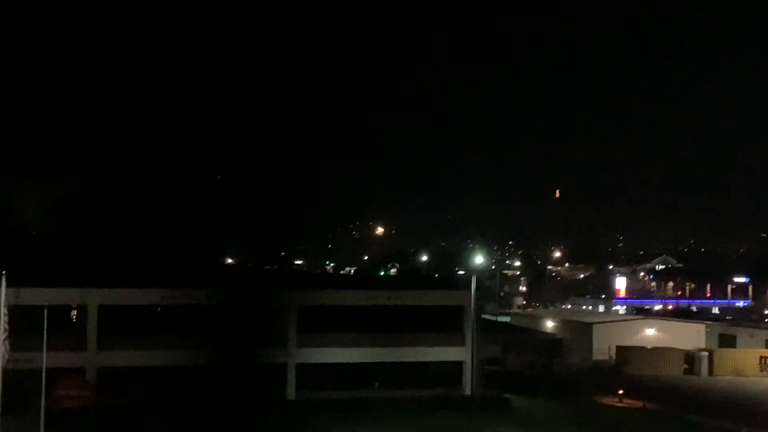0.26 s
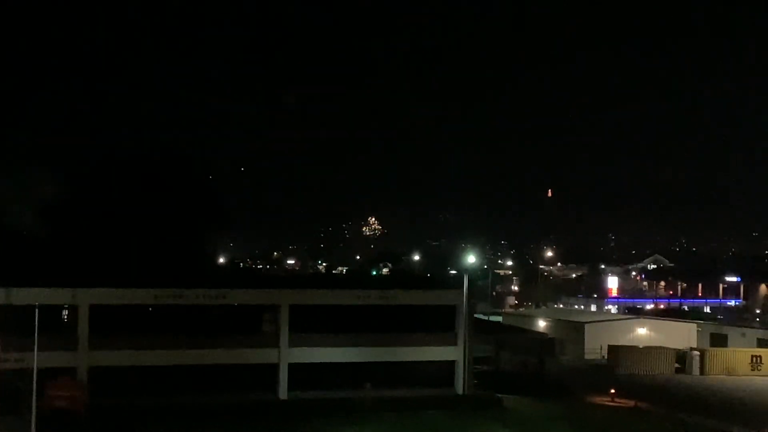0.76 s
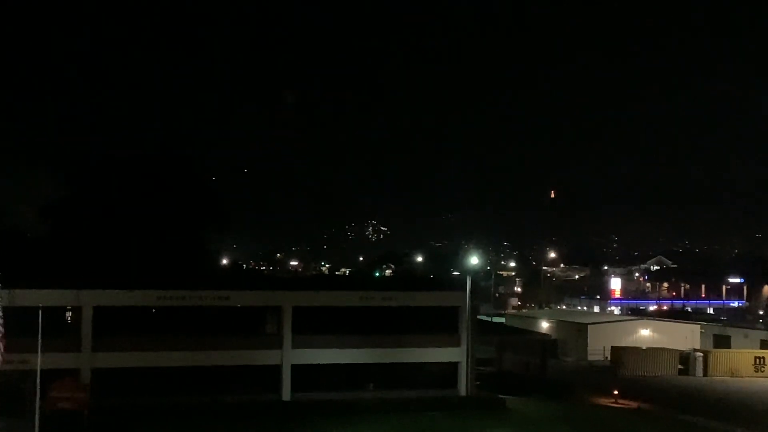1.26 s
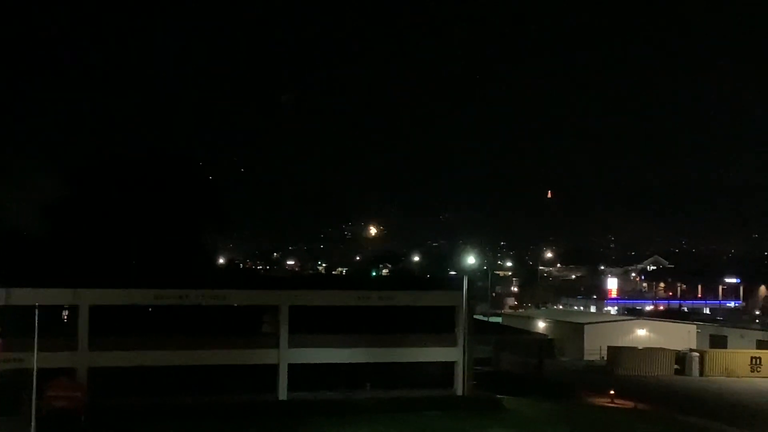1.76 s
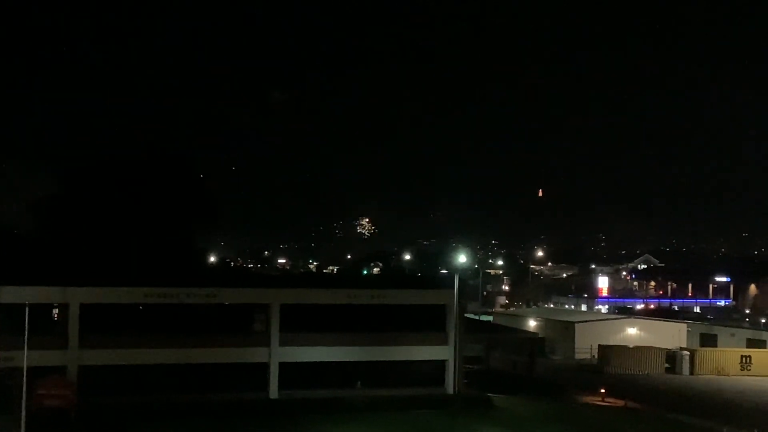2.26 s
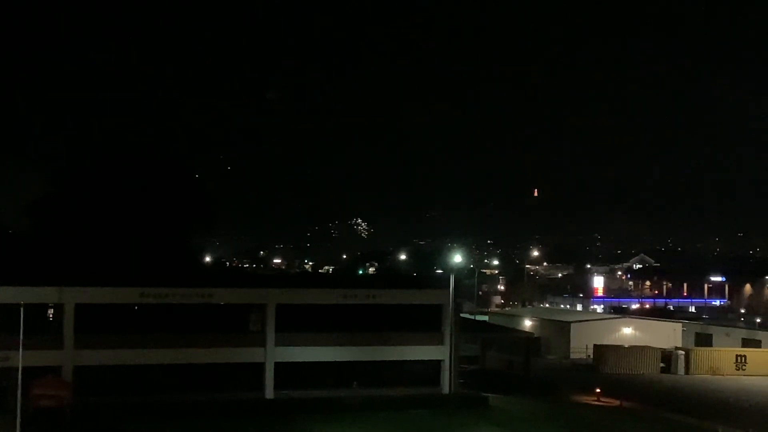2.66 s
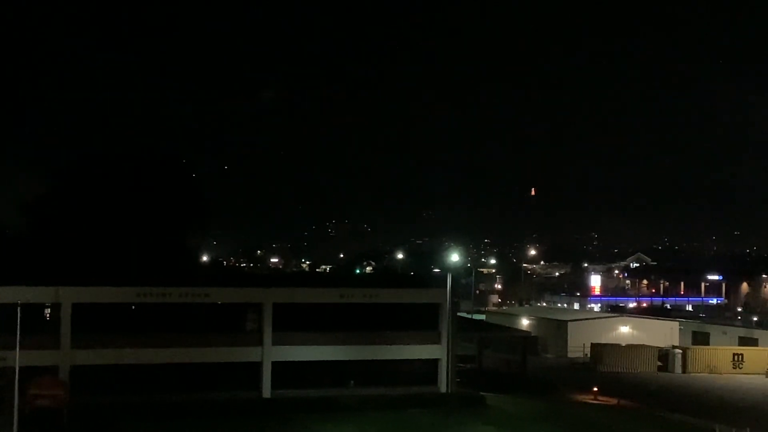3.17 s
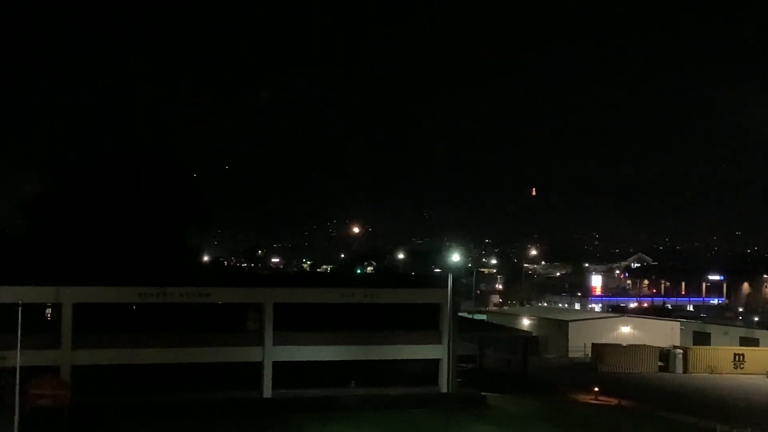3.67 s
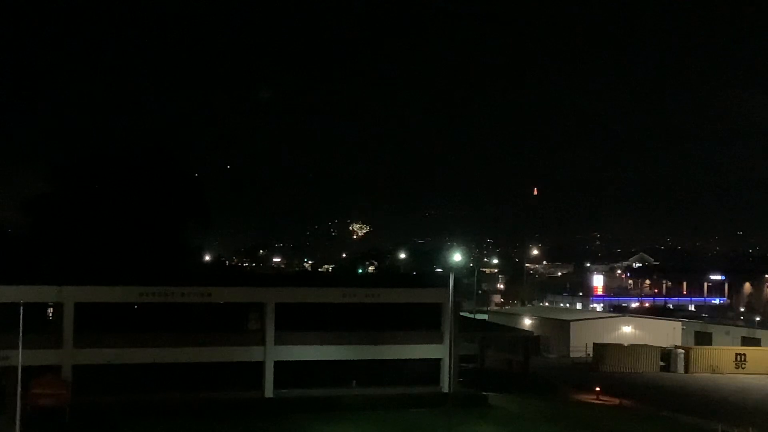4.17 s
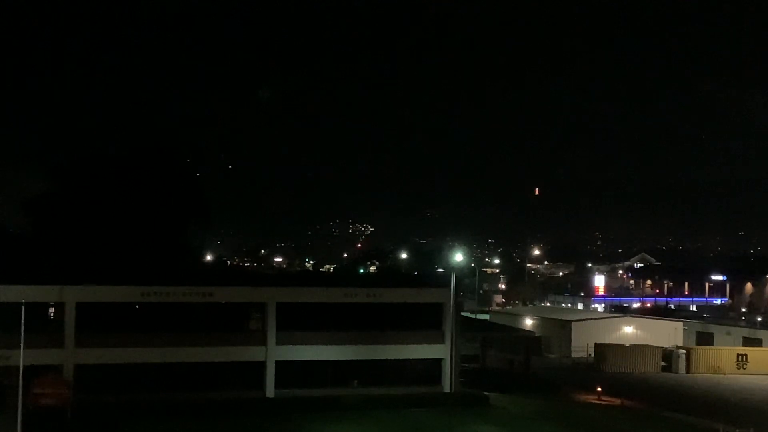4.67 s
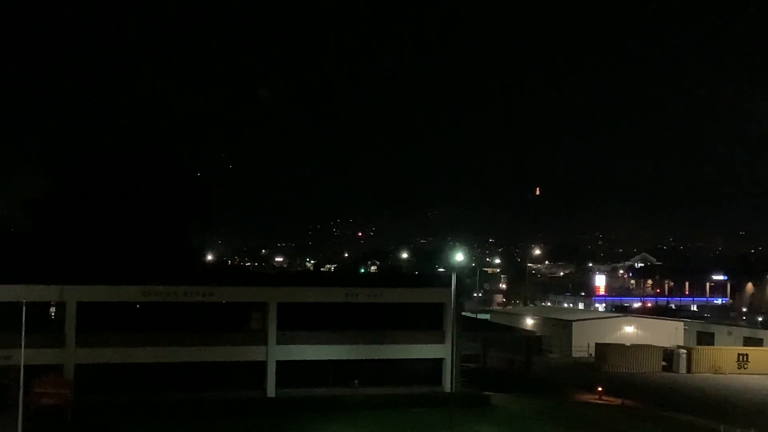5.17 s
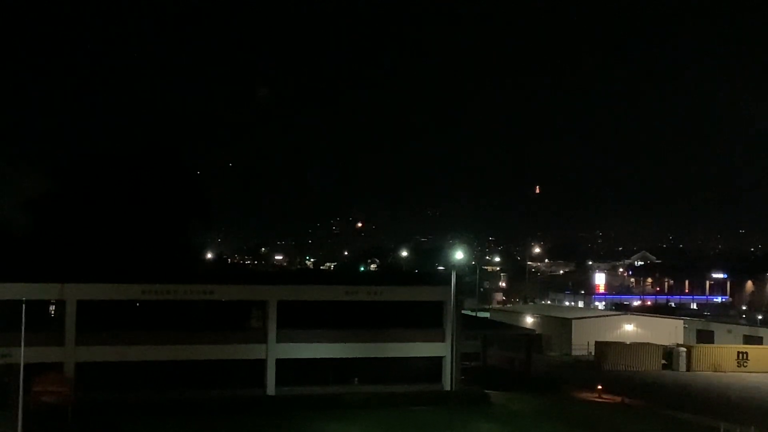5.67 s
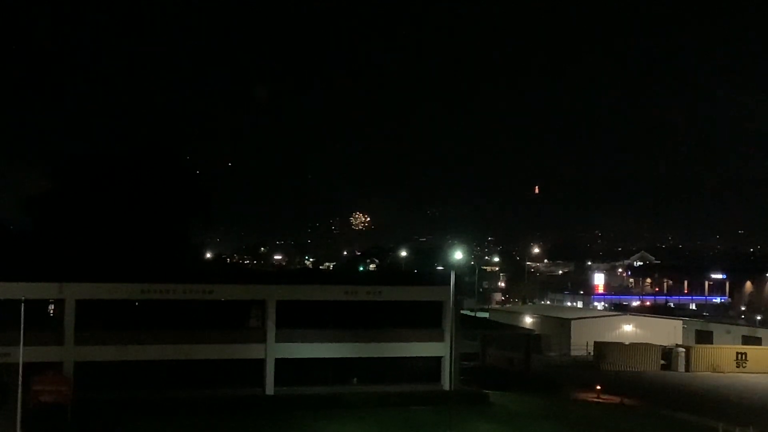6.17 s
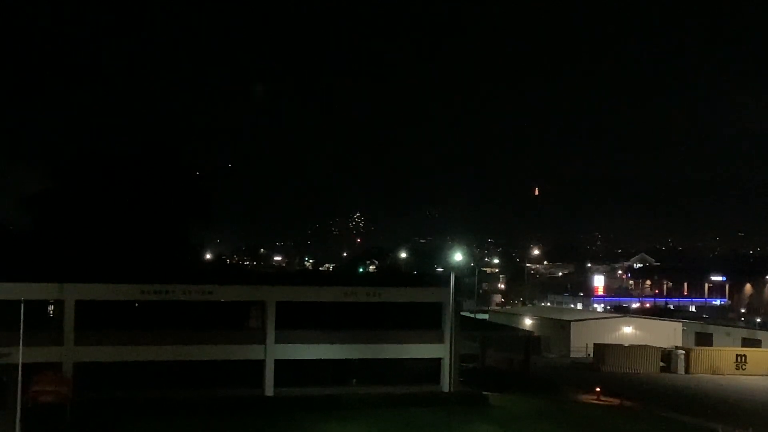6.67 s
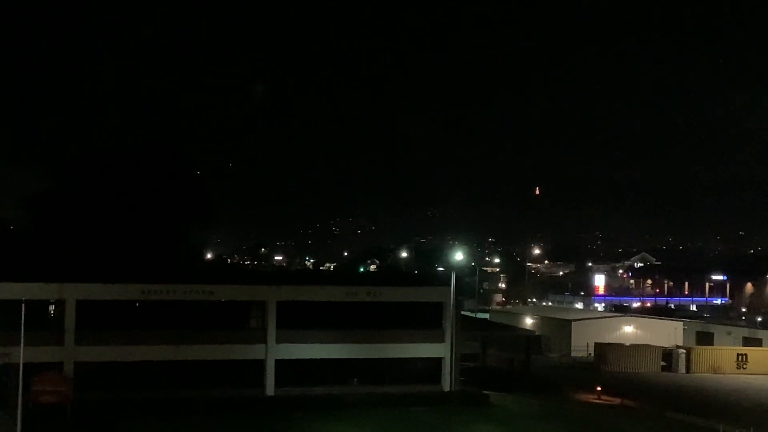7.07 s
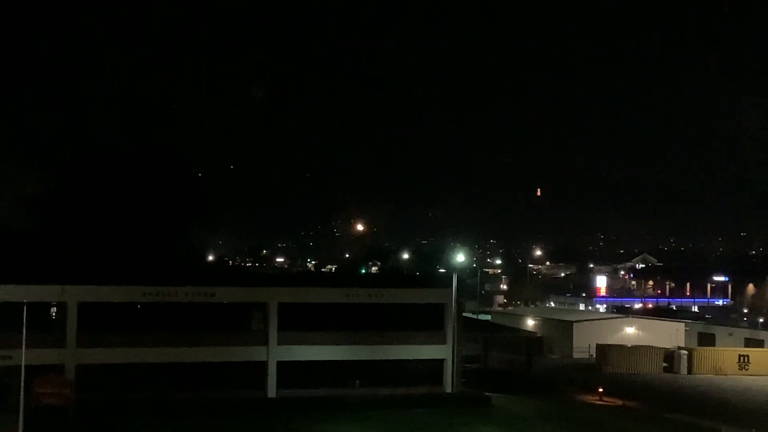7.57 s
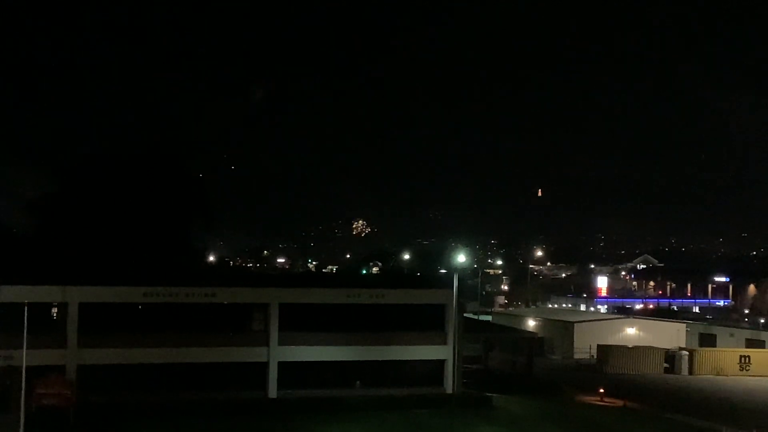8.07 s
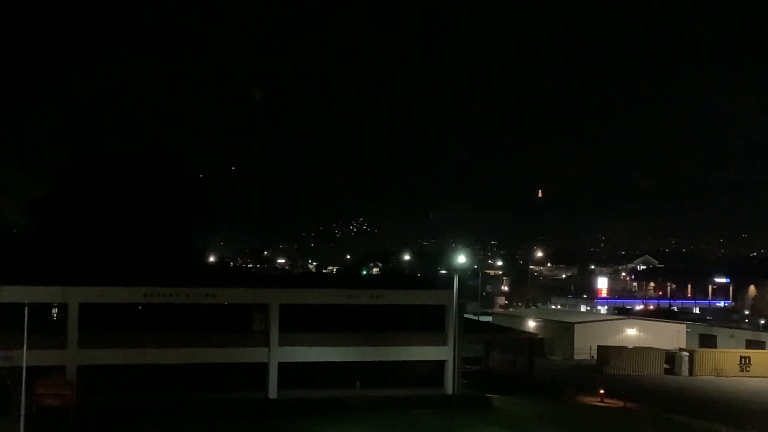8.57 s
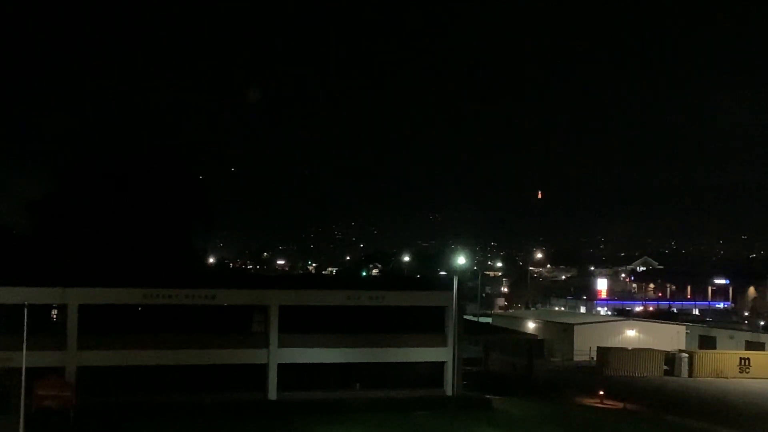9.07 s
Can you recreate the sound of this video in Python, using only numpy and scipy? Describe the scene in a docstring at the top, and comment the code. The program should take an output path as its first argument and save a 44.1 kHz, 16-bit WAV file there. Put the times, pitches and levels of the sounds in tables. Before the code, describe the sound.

A distant firework display heard outdoors at night from a hillside, treble dulled by air, with a steady low town hum and faint microphone hiss. At 0 s, fading crackle and the soft roll of earlier shells. Around 0.4-1 s, tiny close rustles of hiss, a cluster of short hollow pops and low thumps, and a grainy swell of crackle. From 2.0 to 2.7 s a dense salvo of about eleven heavy shells: muffled cracks with deep booms just behind, smeared by echoes. Snaps and thumps trail to 3.2 s while hills roll back the rumble; two very faint whistles arch near 3.3 and 3.5 s. Pops near 4.1 s; a distant wash of cracks returns around 4.6-5.2 s. Sparse thumps follow, then crackle and rapid snaps peak at 6.5-7.1 s. It thins out until one heavy bang at 8.45 s, with rolling echoes and a few last pops to about 9.1 s.

```python
"""Fireworks over a town, heard at night from a hillside far away.
From the start the town hums, grainy bursts of crackling stars swell and fade, and older shells still roll.
Close rustles of hiss come next, then short pops, ragged snaps with hollow bodies, and low resonant thumps.
At two seconds a salvo of heavy shells cracks with a boom just behind; slopes and hills roll it back.
Two faint gliding whistles pass, a far ridge returns a wash of cracks, and late on a single heavy shell goes off."""
import sys
import numpy as np
from scipy import signal
from scipy.fft import rfft, irfft
from scipy.io import wavfile
from scipy.ndimage import uniform_filter1d, minimum_filter1d

SR = 44100
rng = np.random.default_rng(int(sys.argv[2]) if len(sys.argv) > 2 else 0)


def log_audio(samples):
    """Write samples as a 16-bit WAV file to the path given in sys.argv[1]."""
    # one column per channel
    frames = np.atleast_2d(samples).T
    # limit to full scale, then quantise
    limited = np.clip(frames, -1, 1)
    pcm = np.round(limited * 32767).astype(np.int16)
    wavfile.write(sys.argv[1], SR, pcm)


N = 410571  # length in samples

# Layer levels in the tables are set before echoes, wavering and the trim of the whole mix.


def undb(db):
    """Decibels to gain."""
    return 10 ** (np.asarray(db) / 20)


def unit(x):
    """Scale to rms 1."""
    return x / np.sqrt(np.mean(x ** 2))


def unit_peak(x):
    """Scale so that the loudest 5 ms have rms 1."""
    return x / np.sqrt(uniform_filter1d(x ** 2, size=220).max())


def add(out, start_s, x):
    """Mix x into out from start_s on, cutting what runs past the end."""
    start = max(int(start_s * SR), 0)
    out[start:start + len(x)] += x[:max(len(out) - start, 0)]


def pulse(spectrum, lag_cycles=0, size=8192):
    """Causal pulse with this spectrum; a long grazing path delays each frequency by some of its own cycles."""
    hz, db = np.transpose(spectrum)
    log_f = np.log(np.maximum(np.fft.rfftfreq(size, 1 / SR), 10))
    level_db = np.interp(log_f, np.log(hz), db)
    # folding the cepstrum forward gives minimum phase: the energy comes as early as it can
    cepstrum = irfft(np.log(undb(level_db)))
    cepstrum[1:size // 2] *= 2
    cepstrum[size // 2 + 1:] = 0
    lag_phase = 2j * np.pi * lag_cycles * log_f
    return irfft(np.exp(rfft(cepstrum) - lag_phase))[:size // 2]


def colour(x, spectrum):
    """Filter by a spectrum, rms 1."""
    return unit(signal.fftconvolve(x, pulse(spectrum))[:N])


def tune(x, hz, q):
    """Broad resonance that gives a sound its own pitch."""
    return signal.lfilter(*signal.iirpeak(hz, q, fs=SR), x)


def air(x, edge_hz):
    """A long way through air takes the treble."""
    return signal.sosfilt(signal.butter(3, min(edge_hz, .4 * SR), fs=SR, output="sos"), x)


def grains(per_s, spread_db, count=N):
    """Random clicks, many small and a few large, rms 1."""
    chance, size = rng.random(count), rng.exponential(size=count)
    sign = rng.choice([-1, 1], count)
    # sizes spread exponentially in dB, capped so that no grain stands out alone
    level = undb(spread_db * np.minimum(size, 4))
    return unit((chance < per_s / SR) * sign * level)


def scatter(x, db, t60, wait_s):
    """The sound followed by a dying spray of echoes from roofs and trees."""
    t = np.arange(SR // 3) / SR
    decay = np.exp(-np.log(1000) * t / t60)
    onset = np.clip(t / wait_s - 1, 0, 1)
    echoes = grains(2500, 3, count=len(t)) * decay * onset
    echoes *= undb(db) / np.linalg.norm(echoes)
    echoes[0] = 1  # the direct sound
    return signal.fftconvolve(x, echoes)


def walk(rate):
    """Random levels held 1 / rate s and slewed twice, rms 1."""
    hold = int(SR / rate)
    steps = np.repeat(rng.standard_normal(N // hold + 1), hold)
    return unit(uniform_filter1d(uniform_filter1d(steps, hold), hold)[:N])


def even(x, size=1764):
    """Smooth out chance swells, as a great many overlapping echoes do; rms 1."""
    power = uniform_filter1d(uniform_filter1d(x ** 2, size=size), size=size)
    return unit(x / np.sqrt(power + np.mean(power) / 20))


# spectrum of the town's hum: freq_hz, level_db
TOWN_SPECTRUM = [(20, -49), (33, -30), (48, -5), (82, 3), (125, -3.5), (200, -5.5), (350, -9), (700, -17.5),
                 (1500, -26), (3000, -61)]


def town():
    """Low hum of streets: shaped noise, gently wavering."""
    return colour(rng.standard_normal(N), TOWN_SPECTRUM) * undb(-37.5 + 0.27 * walk(1.2))


# bursts of crackling stars: turn_s (end of the swell), roar_db, fizz_db,
# fade_db_per_s (of the roar; below zero it goes on rising)
STAR_BURSTS = [(0.0, -46.5, -60, 12.5), (0.63, -39, -56, 10), (2.62, -40, -54.5, 10.5),
               (3.5, -42, -60, 9.5), (4.021, -44, -56.5, 16), (4.95, -67, -65.5, 8),
               (6.568, -39, -51.5, 11), (6.98, -53, -75, 40), (8.6, -65, -66, 4), (9.3, -54, -64, -1)]
# spectrum of the stars' roar: freq_hz, level_db
ROAR_SPECTRUM = [(100, -19.5), (280, 2.5), (480, 2), (720, -0.5), (1000, -11), (1600, -14), (2200, -25.5),
                 (3000, -31.5), (4200, -43.5), (8000, -89.5)]
# spectrum of the stars' fizz: freq_hz, level_db
FIZZ_SPECTRUM = [(900, -16), (2000, 11), (2900, 8.5), (4000, -2.5), (5800, -7.5), (6600, -23.5),
                 (9000, -27), (15000, -43.5)]
# spectrum of a snap, in the stray stars and the pops, before tuning: freq_hz, level_db
SNAP_SPECTRUM = [(150, -6), (400, 1), (750, 3), (1200, 2), (1750, -1), (2200, -9), (3000, -13), (4000, -30),
                 (6000, -32), (9000, -55)]
SWELL_DB_PER_S, FIZZ_HASTE = 28, 1.31  # build of the roar; the fizz comes and goes this many times faster
FAR_ROAR_DB, FAR_FIZZ_DB = -51.5, -68  # the rest of the display, always there
STRAYS_PER_S, STRAY_DB = 12, -12  # single stars that stand out of the roar
BUNCHES_PER_S, BUNCH_ROAR_DB, BUNCH_FIZZ_DB = 90, 0.7, 1.4  # how often and how far bunched stars jump


def crackle():
    """Stars going off in bunches make a grainy roar with fizz on top, and a few snap out singly."""
    t = np.arange(N) / SR
    roar_level, fizz_level = undb(FAR_ROAR_DB), undb(FAR_FIZZ_DB)
    for turn_s, roar_db, fizz_db, fade_db_per_s in STAR_BURSTS:
        below_db = np.maximum(SWELL_DB_PER_S * (turn_s - t), fade_db_per_s * (t - turn_s))
        roar_level = np.hypot(roar_level, undb(roar_db - below_db))
        fizz_level = np.hypot(fizz_level, undb(fizz_db - FIZZ_HASTE * below_db))
    # roar and fizz share the same stars and bunches
    stars, bunches = grains(1400, 2.8), walk(BUNCHES_PER_S)
    roar = colour(stars + 1.03 * rng.standard_normal(N), ROAR_SPECTRUM)
    roar = roar * undb(6.5 + BUNCH_ROAR_DB * bunches)
    fizz = colour(stars + 0.73 * rng.standard_normal(N), FIZZ_SPECTRUM)
    fizz = fizz * undb(0.47 + BUNCH_FIZZ_DB * bunches)
    strays = scatter(grains(STRAYS_PER_S, 3.1), db=-3.0, t60=0.072, wait_s=0.00027)
    strays = unit(tune(colour(strays, SNAP_SPECTRUM), hz=990, q=0.55))
    return (roar + undb(STRAY_DB) * strays) * roar_level + fizz * fizz_level


# heavy shells: start_s, crack_db, body_db (hollow), boom_db, treble_edge_hz (first path), boom_pitch_hz
HEAVY_SHELLS = [(2.002, -19.5, -23.5, -5, 2820, 190), (2.077, -20, -28.5, -3, 2770, 192.6),
                (2.0828, -20.5, -23, -7, 2800, 190.4), (2.1153, -21.5, -23, -11.5, 2780, 189.3),
                (2.1501, -26, -25.5, -12, 2720, 199), (2.240, -22.5, -35, -5.5, 2900, 193),
                (2.286, -23.5, -33, -6.5, 2900, 180), (2.342, -21, -22.5, -5.5, 3040, 184.3),
                (2.4729, -15, -17, -3.5, 4420, 199.2), (2.4863, -32, -24.5, -8.5, 3040, 182.5),
                (2.666, -25, -27, -12.5, 2970, 185), (8.4454, -17, -15, -6, 2430, 191)]
# hills that return each heavy boom as a low roll: delay_s, spread_s, level_db
HILL_RETURNS = [(0.65, 0.2, -34), (1.701, 0.68, -34), (3.3, 0.25, -34), (4.301, 0.27, -38.5)]
# spectrum of the roll: freq_hz, level_db
ROLL_SPECTRUM = [(40, -45), (90, -13.5), (122, -10.5), (160, -7.5), (200, 0), (225, -11), (255, -9.5),
                 (380, -31), (600, -30.5), (2000, -85)]
OLD_ROLL_DB, OLD_ROLL_DB_PER_S = -36.5, 2.5  # roll of earlier shells at the start, and its decay


def roll():
    """Hills return every heavy boom as a dense, even roll, on top of what is left from earlier shells."""
    t = np.arange(N) / SR
    power = undb(OLD_ROLL_DB - OLD_ROLL_DB_PER_S * t) ** 2
    returns = np.zeros(N)
    for delay_s, spread_s, level_db in HILL_RETURNS:
        returns += undb(level_db) ** 2 * np.exp(-.5 * ((t - delay_s) / spread_s) ** 2)
    for start_s, _, _, boom_db, _, _ in HEAVY_SHELLS:
        add(power, start_s, undb(boom_db) ** 2 * returns)
    rumble = even(colour(grains(1600, 1.2), ROLL_SPECTRUM))
    return rumble * np.sqrt(power) * undb(-0.67 + 0.85 * walk(19))


# faint high rustles close by: start_s, fade_s (to 1/e), level_db
RUSTLE_EVENTS = [(0.35, 0.04, -62), (0.5, 0.26, -68), (9, 0.066, -74)]
# spectrum of a rustle: freq_hz, level_db
RUSTLE_SPECTRUM = [(3000, -26), (4300, -2), (5100, 2), (6100, 1), (6700, -8), (9000, -14), (12000, -33)]


def rustles():
    """Tiny scrapes of hiss that start quickly and die."""
    hiss, level = colour(rng.standard_normal(N), RUSTLE_SPECTRUM), np.zeros(N)
    t = np.arange(SR // 2) / SR
    attack = np.minimum(t / .002, 1)
    for start_s, fade_s, level_db in RUSTLE_EVENTS:
        add(level, start_s, undb(level_db) * attack * np.exp(-(t / fade_s) ** 2))
    return hiss * level


# short pops (small shells, single loud stars and hollow echoes): start_s, crack_db, body_db, snap_pitch_hz
POP_EVENTS = [(0.424, -27.5, -21, 1490), (0.487, -39.5, -39.5, 1100), (0.635, -24.5, -32.5, 1050),
              (0.679, -34.5, -39, 850), (0.697, -26.5, -24, 650), (0.737, -34.5, -35, 700),
              (0.775, -38.5, -42, 1200), (0.8145, -30, -24, 600), (1.042, -36, -44, 1590),
              (1.661, -46, -33.5, 594), (2.411, -36, -26.5, 600), (2.589, -34.5, -26.5, 800),
              (2.697, -25, -31, 997), (2.760, -27.5, -28, 755), (2.835, -36, -32.5, 994),
              (2.992, -35.5, -25, 493), (3.045, -36.5, -29.5, 600), (3.1047, -34.5, -34, 1210),
              (3.675, -37, -30, 600), (3.705, -35, -49, 1000), (4.076, -24.5, -32, 900),
              (4.139, -27, -23.5, 650), (4.484, -34.5, -37, 1300), (4.558, -40, -39, 600),
              (5.429, -43, -28.5, 450), (5.633, -28, -24, 750), (5.898, -42, -47, 920),
              (6.124, -47, -32, 500), (6.211, -35, -36, 900), (6.358, -41, -43, 1100),
              (6.538, -27, -41.5, 1100), (6.5815, -23, -31, 900), (6.603, -30, -32, 650),
              (6.6196, -27.5, -32.5, 1100), (6.647, -28, -28, 550), (6.685, -24.5, -30.5, 695),
              (6.73, -25, -35, 945), (6.794, -27.5, -31, 800), (6.947, -37, -45, 1090),
              (6.988, -35, -32, 1200), (7.028, -33.5, -38, 1100), (7.131, -29.5, -24, 600),
              (7.6, -42, -30, 600), (7.688, -38, -26, 450), (7.786, -45, -27.5, 450),
              (8.157, -47, -34.5, 600), (8.7055, -35, -31, 900), (9.0652, -30, -24.5, 765)]
# spectrum of the hollow body of pops and heavy shells: freq_hz, level_db
BODY_SPECTRUM = [(100, -19.5), (220, -9.5), (300, 0.5), (470, -5), (680, -10.5), (1000, -21), (2000, -33),
                 (5000, -87.5)]


def pops():
    """A compact, ragged snap at its own pitch, with a hollow body smeared by the rooftops."""
    snap = pulse(SNAP_SPECTRUM, lag_cycles=0.495)
    body = unit_peak(pulse(BODY_SPECTRUM, lag_cycles=0.797))
    out = np.zeros(N)
    for start_s, crack_db, body_db, snap_pitch_hz in POP_EVENTS:
        crack = scatter(tune(snap, snap_pitch_hz, q=1.3), db=-1, t60=0.05, wait_s=0.0004)
        add(out, start_s, undb(crack_db) * unit_peak(crack))
        add(out, start_s, undb(body_db) * scatter(body, db=0.5, t60=0.12, wait_s=0.0014))
    return out


# low thumps (lows of shells, crackle and ridge echoes): start_s, level_db, pitch_hz
THUMP_EVENTS = [(0.426, -15, 227), (0.445, -18.5, 124.8), (0.823, -23, 182), (0.887, -20.5, 195),
                (1.196, -26, 178), (2.541, -15.5, 149), (2.603, -17.5, 150), (2.70, -14, 137.3),
                (2.827, -18.5, 160.3), (2.991, -32, 171), (3.036, -20.5, 146), (4.174, -28, 198),
                (5.311, -22, 195), (5.496, -25, 200), (5.63, -32, 205), (5.721, -21, 196),
                (6.116, -28, 196), (6.58, -26, 131), (6.623, -32, 110), (6.684, -27, 170),
                (7.132, -25.5, 188), (7.791, -34, 169), (8.464, -22.5, 150), (8.85, -22.5, 198),
                (8.885, -31, 187), (9.07, -24.5, 172)]
# spectrum of a thump before tuning: freq_hz, level_db
THUMP_SPECTRUM = [(40, -24.5), (90, 1.5), (150, -2), (200, -1), (270, 0), (400, -25), (1000, -41),
                  (3000, -88.5)]


def thumps():
    """Low thumps, each a dull pulse through a resonance at its own pitch, smeared by echoes."""
    dull, out = pulse(THUMP_SPECTRUM, lag_cycles=0.4664), np.zeros(N)
    for start_s, level_db, pitch_hz in THUMP_EVENTS:
        thump = unit_peak(tune(dull, pitch_hz, q=1.8))
        add(out, start_s, undb(level_db) * scatter(thump, db=1.0, t60=0.28, wait_s=0.002))
    return out


def valley(x):
    """Far slopes return the reports as a long roll and lose some of the bass."""
    t = np.arange(3 * SR) / SR
    echoes = grains(300, 3.2, count=len(t)) * undb(-60 * t / 2.0) * (1 - np.exp(-t / 0.02))
    bass = signal.sosfilt(signal.butter(1, 300, fs=SR, output="sos"), x)
    returned = x - 0.37 * bass
    return undb(-11.5) * signal.fftconvolve(returned, echoes / np.linalg.norm(echoes))[:N]


# paths of a heavy report by way of the slope: delay_s, crack_db, boom_db, treble_share (of the edge, 0-1)
SLOPE_PATHS = [(0, 3, -13.5, 1), (.0078, -3.5, 3, 0.65), (0.013, -9.5, -29, .6),
               (0.042, -24.5, -25.5, 0.35)]
# buildings, and a hill for the latest ones, slap each heavy crack back: delay_s, level_db (relative to the
# crack setting)
SLAPS = [(.051, -20.5), (.178, -22.5), (0.219, -22.5), (.364, -21.5), (.402, -22.5)]
# spectrum of a heavy crack: freq_hz, level_db
CRACK_SPECTRUM = [(120, -11), (300, -3.5), (750, 4.5), (1100, -4), (1600, -7.5), (2200, -21.5), (3000, -22),
                  (4000, -37.5), (6000, -50.5), (9000, -74)]
# spectrum of a boom before shifting to the shell's pitch: freq_hz, level_db
BOOM_SPECTRUM = [(30, -68), (55, -24.5), (75, -10), (104, -0.5), (126, -9.5), (155, 3), (190, 6.5),
                 (220, -4.5), (270, -12), (400, -37), (800, -31), (3000, -80)]
# spectrum of a slap: freq_hz, level_db
SLAP_SPECTRUM = [(150, -17.5), (330, 8), (650, -1), (950, -15.5), (1600, -23.5), (3000, -44), (6000, -86.5)]
BOOM_PEAK_HZ = 190  # where the boom spectrum peaks


def heavy_shells():
    """A crack leads over several paths, the boom peaks with the duller second, and buildings and a hill slap
    back."""
    crack = unit_peak(pulse(CRACK_SPECTRUM, lag_cycles=0.591))
    body = unit_peak(pulse(BODY_SPECTRUM, lag_cycles=0.801))
    slap = unit_peak(pulse(SLAP_SPECTRUM, lag_cycles=0.56))
    out = np.zeros(N)
    for start_s, crack_db, body_db, boom_db, treble_edge_hz, boom_pitch_hz in HEAVY_SHELLS:
        # stretching the frequency axis moves the boom to the shell's own pitch
        boom_spectrum = np.array(BOOM_SPECTRUM) * [boom_pitch_hz / BOOM_PEAK_HZ, 1]
        boom = unit_peak(pulse(boom_spectrum, lag_cycles=0.216))
        cracks, booms = np.zeros(SR // 4), np.zeros(SR // 4)
        for delay_s, path_crack_db, path_boom_db, treble_share in SLOPE_PATHS:
            add(cracks, delay_s, undb(path_crack_db) * air(crack, treble_edge_hz * treble_share))
            add(booms, delay_s, undb(path_boom_db) * boom)
        add(out, start_s, undb(crack_db) * scatter(cracks, db=-3.5, t60=0.14, wait_s=0.002))
        add(out, start_s, undb(body_db) * scatter(body, db=1.5, t60=0.14, wait_s=0.0005))
        add(out, start_s, undb(boom_db) * scatter(booms, db=-13, t60=0.28, wait_s=0.0055))
        for delay_s, level_db in SLAPS:
            smeared = scatter(slap, db=8.5, t60=0.042, wait_s=0.00061)
            add(out, start_s + delay_s, undb(crack_db + level_db) * smeared)
    return out


# faint whistles: top_s, half_length_s, top_pitch_hz, level_db
WHISTLE_EVENTS = [(3.3, .1, 4520, -78.5), (3.51, .135, 3135, -63)]
WHISTLE_SAG_HZ = 248  # fall in pitch half a length from the top
WHISTLE_LATE = 0.25  # loudest this share of a half length after the top


def whistles():
    """Thin, slightly unsteady sine tones that arch in pitch and die."""
    out = np.zeros(N)
    for top_s, half_length_s, top_pitch_hz, level_db in WHISTLE_EVENTS:
        along = np.clip((np.arange(N) / SR - top_s) / half_length_s, -2, 2)
        hz = (top_pitch_hz - WHISTLE_SAG_HZ * along ** 2) * (1 + .001 * walk(60))
        tone = np.sin(2 * np.pi * np.cumsum(hz) / SR)
        out += tone * undb(level_db + walk(17)) * np.exp(-(along - WHISTLE_LATE) ** 4)
    return out


# spectrum of the ridge's wash: freq_hz, level_db
WASH_SPECTRUM = [(600, -21), (1100, 3.5), (1500, -2), (1900, -7), (2400, -24.5), (4000, -51)]
RIDGE_DELAY_S, RIDGE_SPREAD_S, RIDGE_DB = 2.65, 0.17, -36


def ridge():
    """A far ridge returns the cracks of the heavy shells as one grainy wash."""
    t, power = np.arange(N) / SR, np.zeros(N)
    for start_s, crack_db, *_ in HEAVY_SHELLS:
        after = (t - start_s - RIDGE_DELAY_S) / RIDGE_SPREAD_S
        power += undb(crack_db) ** 2 * np.exp(-.5 * after ** 2)
    return colour(grains(900, 2), WASH_SPECTRUM) * np.sqrt(power) * undb(RIDGE_DB)


def house_wall(x):
    """A nearby wall returns all the far sound once more, weak and dull."""
    out = x.copy()
    add(out, .0203, undb(-17.0) * air(x, edge_hz=430))
    return out


def scene():
    """All the reports with their echoes, over the crackling stars and the town."""
    reports = pops() + thumps() + heavy_shells()
    echoes = valley(reports) + roll() + ridge()
    far = reports + echoes + crackle() + town() + whistles()
    return (undb(-2.94) * house_wall(far) + rustles())[None]


# spectrum of the microphone's hiss: freq_hz, level_db
MIC_HISS_SPECTRUM = [(30, -1), (2000, 2.5), (4100, 1.5), (4700, 8.5), (5100, 14.5), (5450, 6.5),
                     (5900, 9.5), (6500, 4.5), (10000, -2.5), (15500, -15.5)]


def record(dry):
    """The microphone adds hiss; the deepest bass is taken out; a limiter holds large peaks; the top is cut."""
    x = dry + undb(-75.5) * colour(rng.standard_normal(N), MIC_HISS_SPECTRUM)
    x = signal.sosfilt(signal.butter(4, 36, "highpass", fs=SR, output="sos"), x)
    gain = .9 / np.maximum(np.abs(x), .9)
    # hold each dip for 10 ms, then smooth it
    x = x * uniform_filter1d(minimum_filter1d(gain, size=441), size=441)
    return signal.sosfilt(signal.ellip(8, .2, 70, 15700, fs=SR, output="sos"), x)


dry = scene()
out = record(dry)
log_audio(out)
```